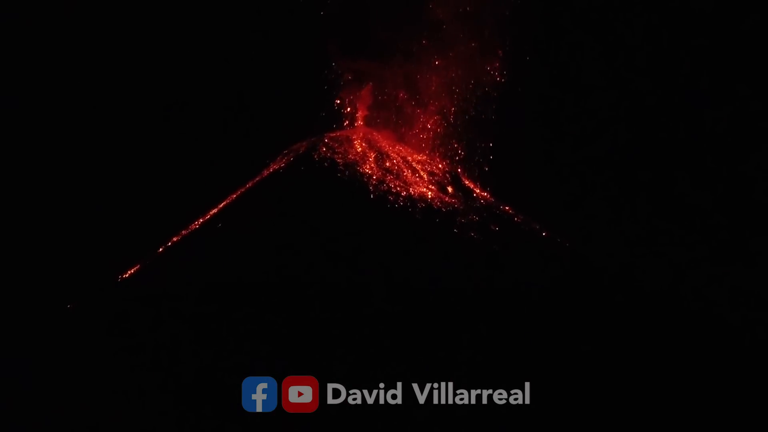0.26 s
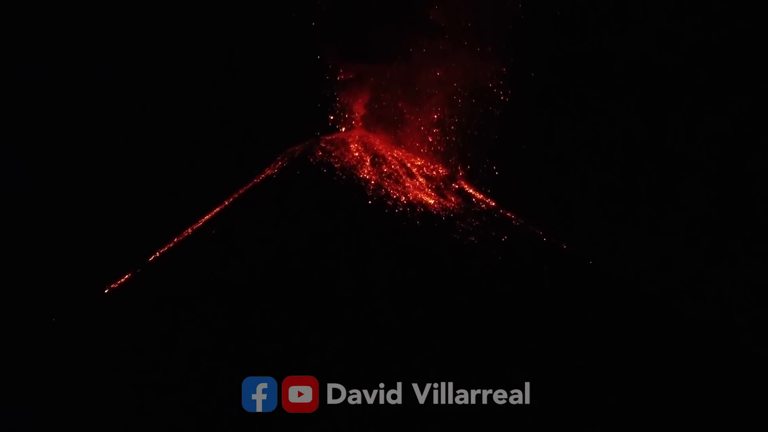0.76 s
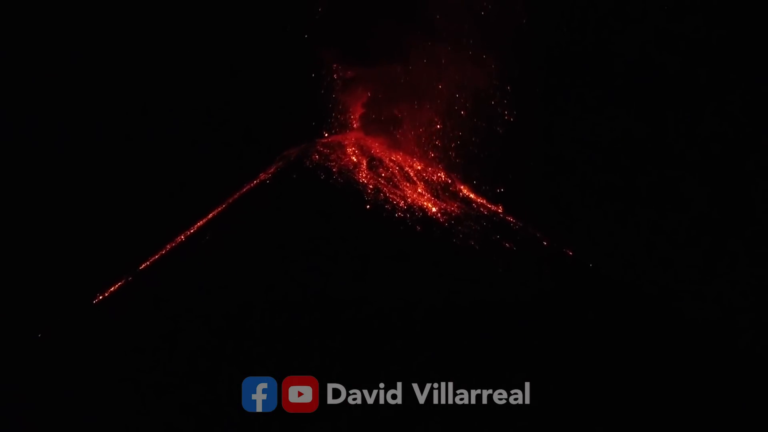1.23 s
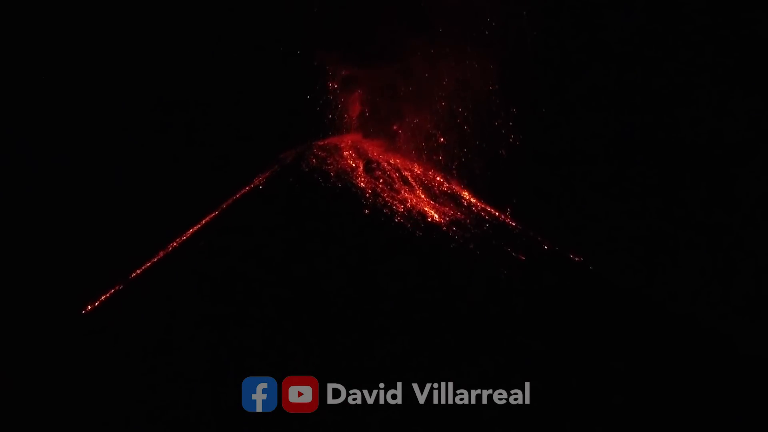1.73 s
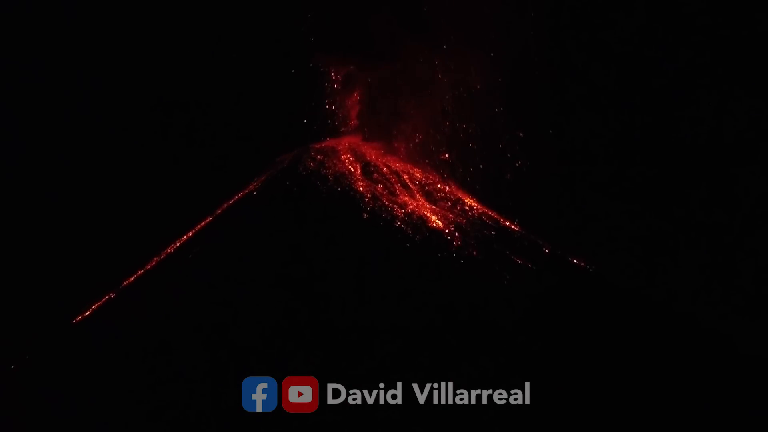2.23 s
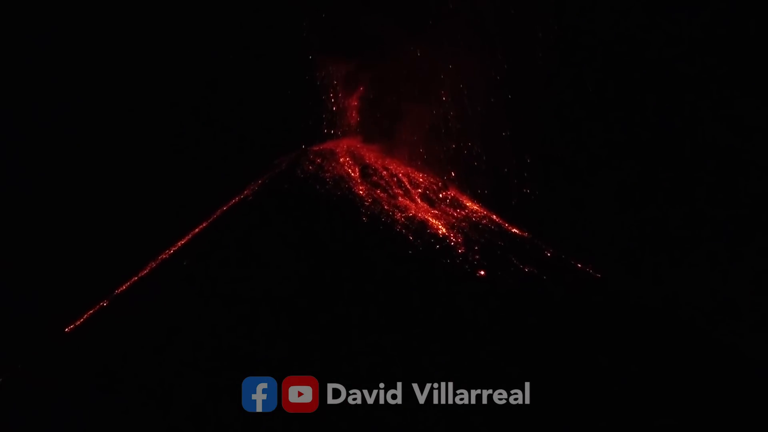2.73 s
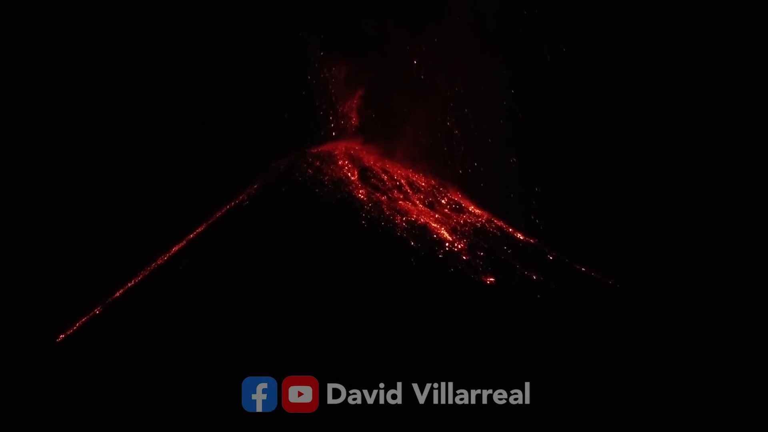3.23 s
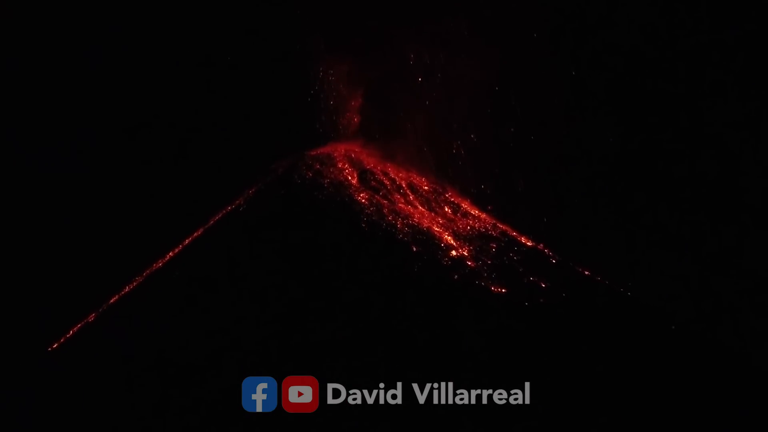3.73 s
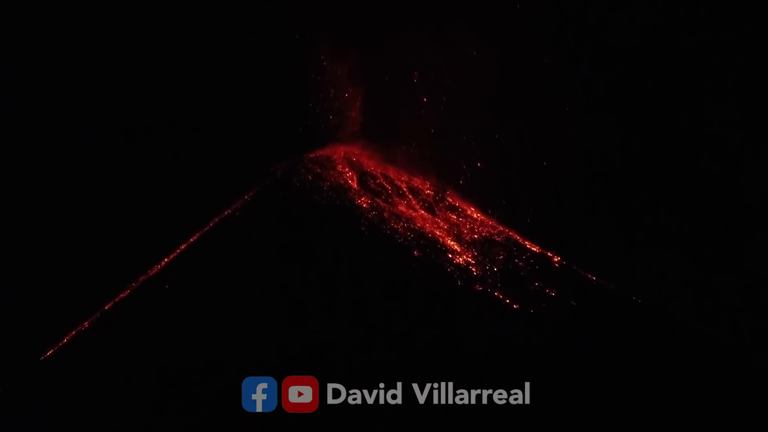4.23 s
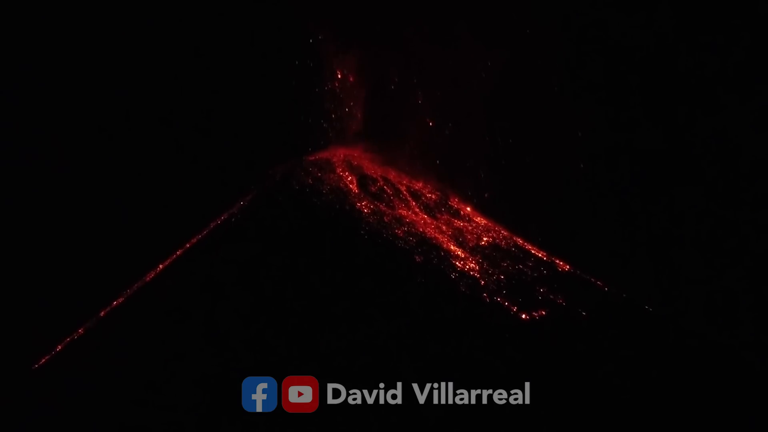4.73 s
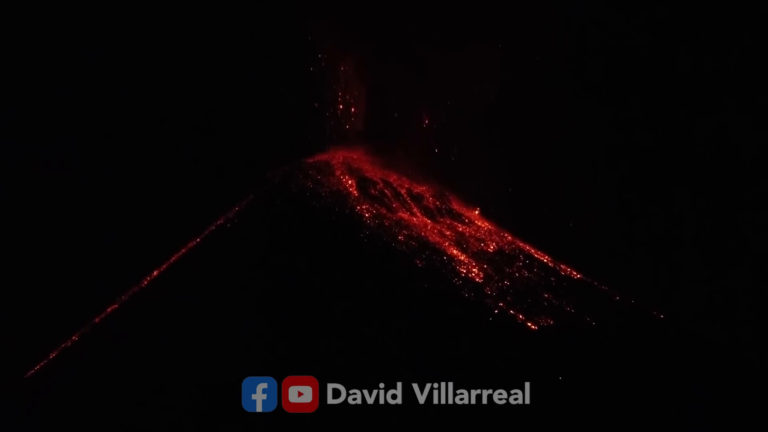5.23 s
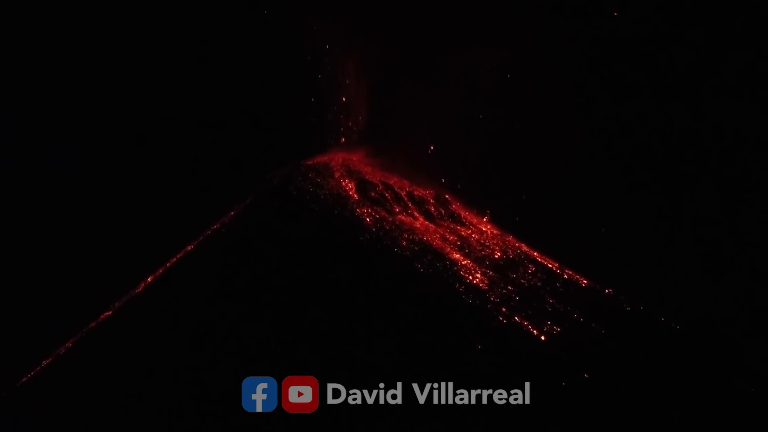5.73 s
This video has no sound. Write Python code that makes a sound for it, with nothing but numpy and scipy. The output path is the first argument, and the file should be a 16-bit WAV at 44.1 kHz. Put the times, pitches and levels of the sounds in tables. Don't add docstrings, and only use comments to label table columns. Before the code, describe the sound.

Night outdoors, a volcano heard from far away. A loud, rough gas roar over deep rumble bursts afresh at about one second, dulls, then sinks through uneven hollow surges. Low booms roll throughout; faint snaps, rock knocks and tiny ticks come later. Wide stereo, distant microphone, treble muffled by air.

```python
import sys
import numpy as np
from scipy import signal
from scipy.fft import rfft, irfft, next_fast_len
from scipy.io import wavfile
from scipy.ndimage import uniform_filter1d

SR = 44100
rng = np.random.default_rng(int(sys.argv[2]) if len(sys.argv) > 2 else 0)


def invert_db(x):
    u = np.asarray(x, float) / 20
    return 10 ** u


def wrap_up_sound(samples):
    columns = np.atleast_2d(samples).T
    tamed = np.clip(columns, -1, 1)
    steps = np.round(tamed * 32767).astype(np.int16)
    wavfile.write(sys.argv[1], SR, steps)


N = 263277

# start, end [s]
HANDOVER_S = [2.5, 2.8]
# (frequency [Hz], factor [1])
JET_ALIKE = [(200, 0.83), (450, 0.97), (900, 1.21), (3000, .9), (7000, .7)]
JET_PAN_DB = -0.77


def unit(x):
    return x / np.sqrt(np.mean(np.abs(x) ** 2) + 1e-20)


def along(points, hz):
    f, v = np.transpose(points)
    return np.interp(np.log(hz + 1), np.log(f + 1), v)


def sides(pan_db):
    return invert_db(np.array([pan_db / 2, -pan_db / 2]))


def coloured(x, colour):
    size = next_fast_len(N + 8192)
    gain = invert_db(along(colour, np.fft.rfftfreq(size, 1 / SR)))
    return irfft(rfft(x, size) * gain, size)[:, :N]


def turbulence(count, spread_db, lean):
    at = rng.integers(0, N, (2, count))
    size = rng.standard_normal((2, count)) + lean
    size = size * invert_db(spread_db * rng.exponential(1, (2, count)))
    trains = np.array([np.bincount(a, s, N) for a, s in zip(at, size)])
    return unit(trains - trains.mean())


def patches(shape, bins, frames):
    field = rng.standard_normal(shape)
    return unit(uniform_filter1d(uniform_filter1d(field, bins, 0), frames, 1))


def roar(eddies, controls, centres_hz, colour, alike, patchy_db, flutter_db):
    frame, overlap = 1024, 768
    hz, t, z = signal.stft(eddies, SR, nperseg=frame, noverlap=overlap)
    levels_db, pan_db, likeness = controls(t)

    share = np.array([along(list(zip(centres_hz, one)), hz) for one in np.eye(len(centres_hz))])
    swell_db = share.T @ levels_db
    swell_db = swell_db + patchy_db * patches(swell_db.shape, bins=12, frames=12)
    swell_db = swell_db + flutter_db * patches(swell_db.shape, bins=90, frames=6)

    correlation = np.clip(np.outer(along(alike, hz), likeness), -.95, .99)
    turn = np.arccos(correlation) / 2
    mid, side = z[0] * np.cos(turn), z[1] * np.sin(turn)
    pair = np.array([mid + side, mid - side]) * invert_db(swell_db) * sides(pan_db)[:, None]
    x = signal.istft(pair, SR, nperseg=frame, noverlap=overlap)[1][:, :N]
    return unit(coloured(x, colour))


def handover_angle():
    return np.interp(np.arange(N) / SR, HANDOVER_S, [0, np.pi / 2])


def blast_swell(t):
    course = [(0, 0.5, 8.5), (.33, 0, 10), (.7, -0.5, 7.5), (.8, 0.5, -0.5), (.995, 0, -8), (1.005, 2, 6.5),
              (1.1, 1.5, 9.5), (1.24, 1.5, 6), (1.53, 1, 8.5), (1.62, 1.5, 3), (1.78, 1, 0.5),
              (1.88, 2, -5), (2.02, 2, -7), (2.1, 2, -12.5), (2.3, -0.5, -15.5), (2.55, -3.5, -5.5),
              (2.66, -3, -8.5)]
    # body, rasp, hiss, top per flow and per speed [dB/dB]; trim [dB]
    per_flow = [0.22, 0.92, 1.6, .1]
    per_speed = [.02, .05, .45, .98]
    part_trim_db = [.1, 0.12, .1, .1]
    burst_s, thump_db, thump_s, body_fade_db_per_s = 1.065, 4, 0.13, 1.5

    s, flow_db, speed_db = np.transpose(course)
    flow_db, speed_db = np.interp(t, s, flow_db), np.interp(t, s, speed_db)
    levels_db = np.outer(per_flow, flow_db) + np.outer(per_speed, speed_db) + np.c_[part_trim_db]
    levels_db[0] += thump_db * np.exp(-((t - burst_s) / thump_s) ** 2)
    levels_db[0] -= body_fade_db_per_s * np.maximum(t - burst_s, 0)
    return levels_db, JET_PAN_DB + 0 * t, .46 + 0.0054 * speed_db


def blast():
    centres_hz = [570, 1500, 3400, 7000]
    colour = [(210, -11.5), (350, 0), (857, -6), (3130, -27), (3960, -33), (6850, -54.5), (8900, -70),
              (15100, -120)]
    air = [(10500, -76), (13000, -87), (15000, -87.5), (17000, -120)]
    eddies = turbulence(count=200000, spread_db=0.82, lean=0.012)
    noise = roar(eddies, blast_swell, centres_hz, colour[:-1] + air, JET_ALIKE,
                 patchy_db=0.95, flutter_db=0.0)
    return invert_db(-23.0) * np.cos(handover_angle()) * noise


def rumble_swell(t):
    centres_hz = [28, 85, 240]
    # start level, eventual loss [dB]
    start_db = [9.5, 0.1, 7.5]
    fade_db = [19, 1.5, 12]
    # (time [s], strength [dB], centre [Hz])
    low_swells = [(.05, 3, 28.1), (.23, 7.5, 40.6), (0.399, 2.5, 40), (.58, 5.5, 83.8), (.69, 5, 240),
                  (.74, 7, 32), (0.881, 12.5, 28.15), (.97, 4, 220), (1.1, 3.5, 234), (1.23, 7, 242),
                  (1.44, 8, 87), (1.57, 7, 220), (1.66, 11.5, 90), (1.99, 10, 27.8), (2.09, 1, 85.2),
                  (2.41, 4, 28.1), (2.71, 5.5, 119.8), (2.819, 5, 28.3), (2.93, 1.5, 86), (3.2, 8, 28),
                  (3.56, 4, 170), (4.111, 2, 84.4), (4.31, 3, 27.6), (4.409, 8, 85.5), (4.59, 6.5, 45.6),
                  (4.721, 6, 199), (4.87, 4.5, 27.6), (5.12, 13.5, 41.5), (5.26, 4.5, 85.4), (5.84, 7.5, 45.1)]
    # (time [s], left-right [dB])
    pan = [(0, 1.1), (1.4, -2), (2.2, 0.5), (3.6, -2.5), (4.9, 1.5), (5.97, -1.5)]
    half_width_s, half_width_octaves, fade_s = 0.065, 0.78, 5.1

    s, db, hz = np.transpose(low_swells)
    reach = np.exp(-(np.log2(np.outer(centres_hz, 1 / hz)) / half_width_octaves) ** 2)
    swells_db = db[:, None] * np.exp(-((t - s[:, None]) / half_width_s) ** 2)
    levels_db = np.c_[start_db] - np.outer(fade_db, np.tanh(t / fade_s)) + reach @ swells_db
    return levels_db, np.interp(t, *np.transpose(pan)), 0.55 - 0.021 * t


def rumble():
    centres_hz = [28, 85, 240]
    # (frequency [Hz], level [dB per Hz])
    colour = [(3.5, -36), (6.0, -12.5), (92, 1.5), (134, -4), (293, -10), (380, -20.5), (490, -31),
              (840, -120)]
    eddies = turbulence(count=30000, spread_db=1.24, lean=0.61)
    return invert_db(-19) * roar(eddies, rumble_swell, centres_hz, colour, [(50, 1.2), (300, 0.84)],
                           patchy_db=0.1, flutter_db=0.4)


def knocks(events, rise_cycles, trim_db):
    out, t = np.zeros((2, N + SR)), np.arange(SR // 2) / SR
    for s, db, hz, pan_db, t60 in events:
        shape = (1 - np.exp(-t * hz / rise_cycles)) ** 2 * invert_db(-60 * t / t60)
        ring = shape / shape.max() * np.sin(2 * np.pi * hz * t)
        start = round(s * SR)
        out[:, start:start + len(t)] += invert_db(db + trim_db) * np.outer(sides(pan_db), ring)
    return out[:, :N]


def booms():
    # (time [s], peak [dB], frequency [Hz], left-right [dB], t60 [s])
    events = [(0.103, 2, 80, 0, 0.071), (0.267, 2, 73.4, -4, 0.12), (0.519, 3, 104.3, -4, 0.37),
              (0.619, 2.5, 89.5, 1.5, 0.2), (0.981, -6, 77.5, -12, 0.1), (1.191, 1, 53.8, -4, 0.12),
              (1.519, -6, 53.8, -7, 0.12), (1.669, -1, 108, 3, 0.081), (1.894, -13, 84, 7, 0.13),
              (2.374, -0.5, 101.6, 6, 0.14), (2.646, -7, 68, 13.5, 0.19), (2.917, 5, 96.6, -2, 0.11),
              (3.457, -9, 79, 24, 0.094), (3.871, 6, 95.6, 7, 0.056), (4.1, -19, 58, -5, 0.1),
              (4.376, -13, 106, 16, 0.097), (4.957, 3, 103.4, -1.0, 0.084), (5.043, -2.5, 80.6, -1, 0.19),
              (5.18, 2.5, 77.6, -3.5, 0.21), (5.42, -2, 104.5, -10, 0.13), (5.719, -6, 113, -4, 0.13)]
    return knocks(events, rise_cycles=1.3, trim_db=-16.5)


def cracks():
    # (time [s], peak [dB], left-right [dB])
    events = [(.175, -52, 0), (.281, -52, 0), (.544, -57, 0), (.7, -58, 0), (2.02, -66, 0),
              (1.9834, -59, -1), (2.1026, -67, -1), (2.134, -70, -5.5), (2.1694, -68, 1), (2.2094, -70, 2),
              (2.3012, -71, -2.5), (2.3431, -62, -1), (2.361, -68, -3), (2.3945, -76, 0), (2.4658, -65, -1),
              (2.617, -60.5, -1)]
    # (frequency [Hz], level [dB])
    colour = [(1500, -20), (4000, 12), (7000, 4), (10000, -6), (12500, -15), (14000, -60)]
    s, db, pan_db = np.transpose(events)
    snaps = np.zeros((2, N))
    snaps[:, np.round(s * SR).astype(int) + 40] = invert_db(db + 13.5) * sides(pan_db)
    hiss = invert_db(-83.5) * rng.standard_normal((2, N))
    return coloured(snaps + hiss, colour)


def ticks():
    # (time [s], peak [dB], frequency [Hz], left-right [dB], t60 [s])
    events = [
        (1.0096, -32, 3310, -4, 0.006),
        (2.3391, -42, 3130, 2, 0.006),
        (5.0429, -45, 3360, -9, 0.006),
        (5.3786, -41, 3960, -4, 0.006),
    ]
    return knocks(events, rise_cycles=1.5, trim_db=-3.5)


def rocks():
    # (time [s], peak [dB], frequency [Hz], left-right [dB], t60 [s])
    falls = [
        (2.152, -7, 595, -1, 0.035),
        (3.885, -15, 403, 1, 0.04),
        (4.643, -22, 660, 3, 0.024),
        (4.716, -15, 401, 9, 0.01),
        (4.723, -34, 401, 0, 0.014),
        (4.735, -29, 401, 1, 0.012),
        (5.194, -29, 1130, 1.0, 0.015),
        (5.674, -22, 675, -4, 0.018),
        (5.895, -19, 690, -15, 0.012),
    ]
    splinter = [
        (5.379, -20, 1460, -3, 0.0059),
        (5.379, -40, 2600, -3, 0.0046),
    ]
    return knocks(falls + splinter, rise_cycles=0.44, trim_db=-7.0)


def surge_swell(t):
    # (time [s], rise [s], length [s], strength [dB], brightness [1])
    events = [
        (2.789, .12, 0.36, 6.5, 1.23),
        (3.419, .15, .3, 1.5, 1.9),
        (3.696, .28, 0.475, 3.5, 1.7),
        (4.422, .12, 0.16, 2, 2.3),
        (4.6, 0.13, .4, 2.5, 2),
        (4.799, 0.085, 0.35, 5.5, .1),
        (5.323, 0.046, .1, 1.5, .8),
    ]
    # lift share [1], start level, eventual loss [dB]
    lift_share = [0.054, 1.08, 0.67, 1]
    start_db = [7.5, 1, -0.5, -1]
    fade_db = [14.1, 8.3, 3.5, 6.3]
    fade_s, fall_s, echoes_grow_s = 2.2, 0.096, 1

    age = np.maximum(t - HANDOVER_S[0], 0)
    s, rise, length, db, bright = (c[:, None] for c in np.transpose(events))
    gate = np.minimum((t - s) / rise, 1 + (s + length - t) / fall_s)
    lift_db = db * np.clip(gate, 0, 1)
    low_db, high_db = lift_db.sum(axis=0), (bright * lift_db).sum(axis=0)
    lifts_db = np.c_[lift_share] * np.array([low_db, low_db, high_db, high_db])
    levels_db = np.c_[start_db] - np.outer(fade_db, np.tanh(age / fade_s)) + lifts_db
    likeness = 0.57 * np.exp(-age / echoes_grow_s) + .045 * low_db
    return levels_db, JET_PAN_DB + 0 * t, likeness


def surges():
    centres_hz = [570, 1750, 3400, 7000]
    colour = [(210, -33), (350, -1), (478, -4), (521, -3.5), (738, -6.5), (847, -7.5), (924, -7.5),
              (983, -8), (1070, -8), (1850, -13.5), (3170, -28), (6850, -46.5), (8900, -59.5),
              (15100, -120)]
    air = [(10500, -73), (12500, -75.5), (14000, -88), (17000, -120)]
    eddies = turbulence(count=200000, spread_db=0.9, lean=.01)
    noise = roar(eddies, surge_swell, centres_hz, colour[:-1] + air, JET_ALIKE,
                 patchy_db=0.25, flutter_db=0.46)
    return invert_db(-28.0) * np.sin(handover_angle()) * noise


def scene():
    return blast() + rumble() + booms() + cracks() + ticks() + rocks() + surges()


def top_cut(x):
    return signal.sosfilt(signal.butter(12, 15000, fs=SR, output="sos"), x)


def record(dry):
    rest, offset, peak_s, width_s, edge_s = .003, .015, 2.1, 1.5, .0008
    t = np.arange(N) / SR
    x = dry + rest + offset * np.exp(-((t - peak_s) / width_s) ** 2)
    x = x * np.sin(np.pi / 2 * np.clip(np.minimum(t, t[::-1]) / edge_s, 0, 1)) ** 2
    return top_cut(x)


dry = scene()
out = record(dry)
wrap_up_sound(out)
```